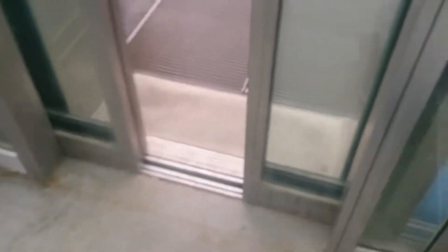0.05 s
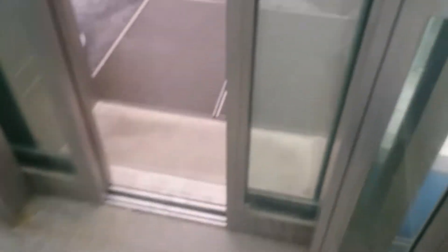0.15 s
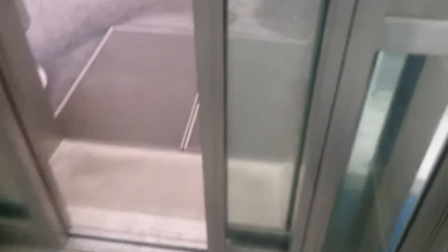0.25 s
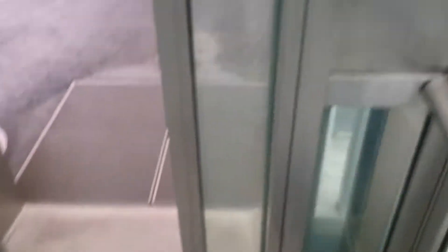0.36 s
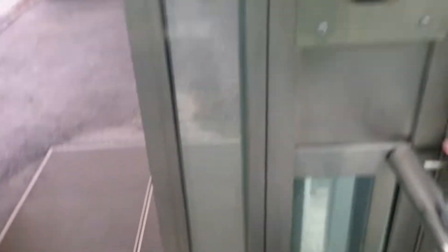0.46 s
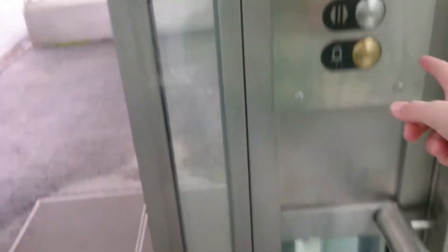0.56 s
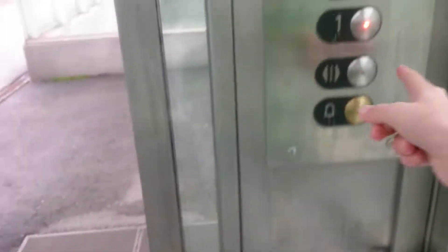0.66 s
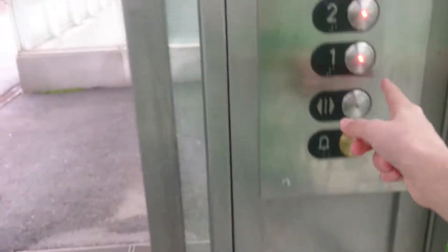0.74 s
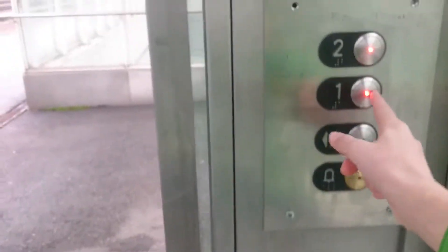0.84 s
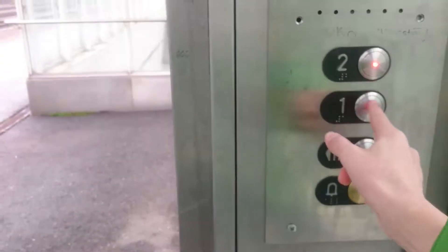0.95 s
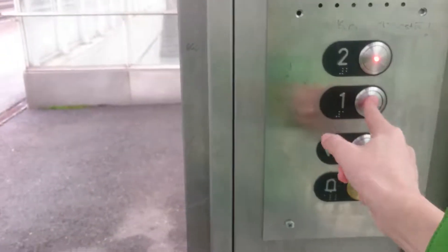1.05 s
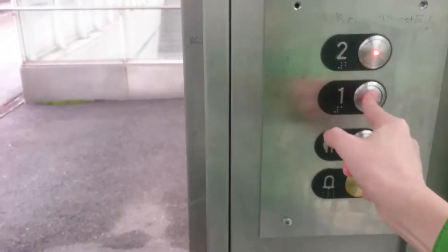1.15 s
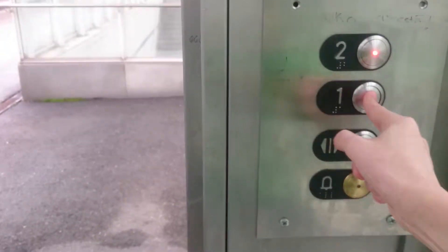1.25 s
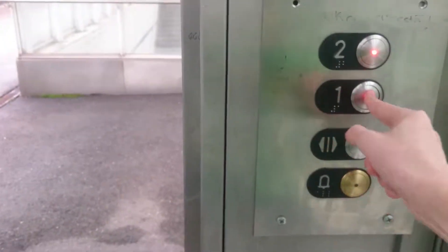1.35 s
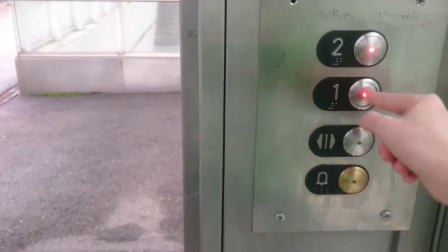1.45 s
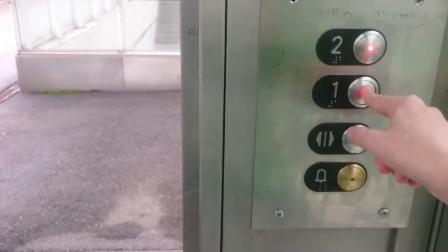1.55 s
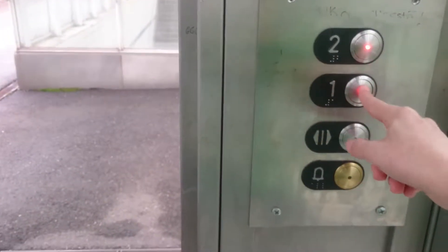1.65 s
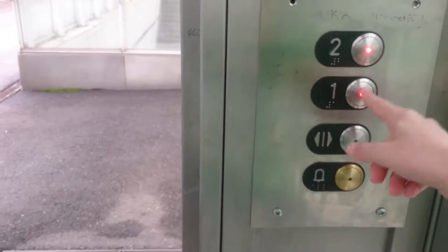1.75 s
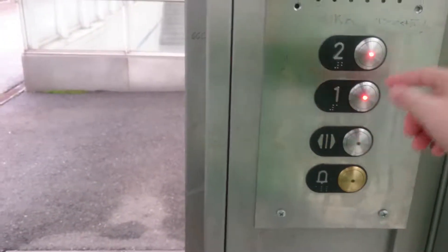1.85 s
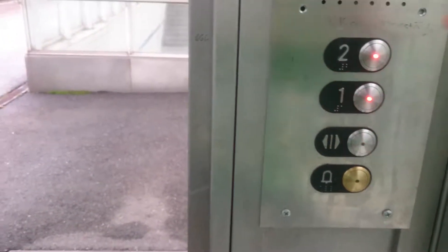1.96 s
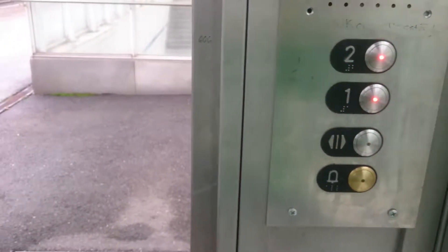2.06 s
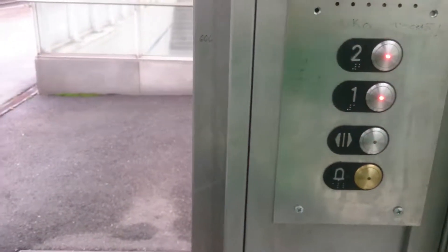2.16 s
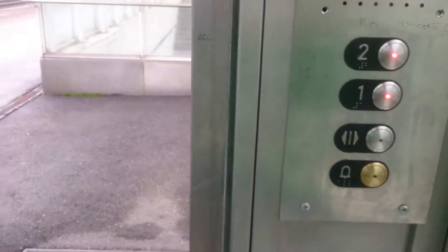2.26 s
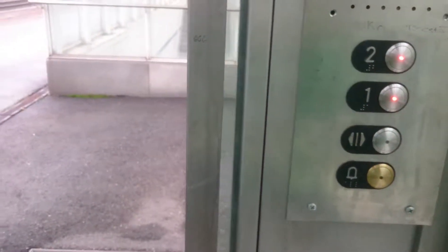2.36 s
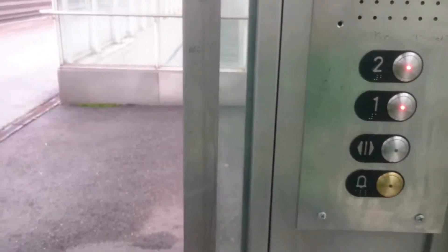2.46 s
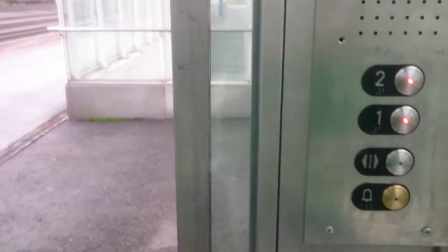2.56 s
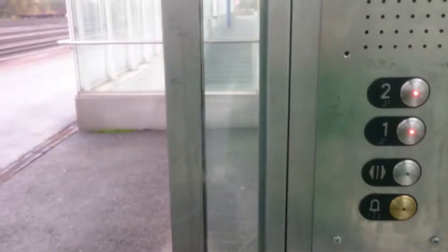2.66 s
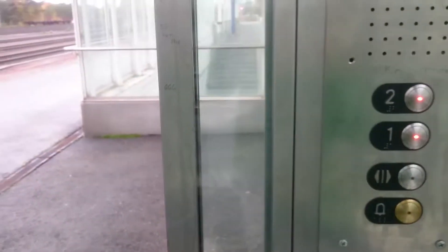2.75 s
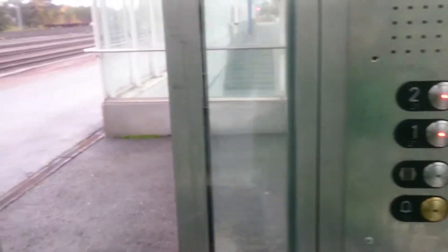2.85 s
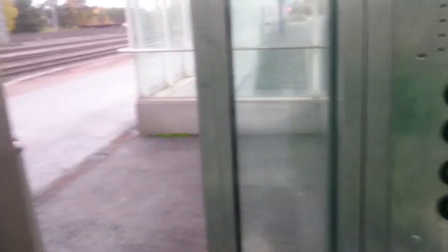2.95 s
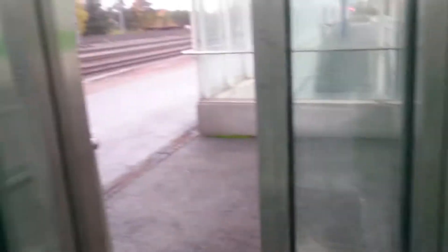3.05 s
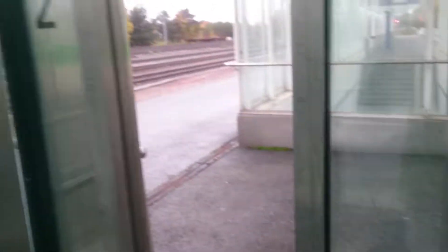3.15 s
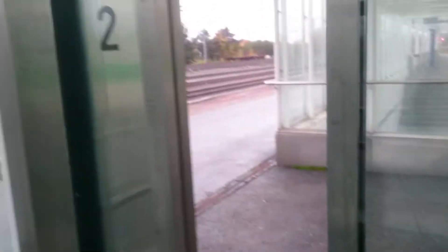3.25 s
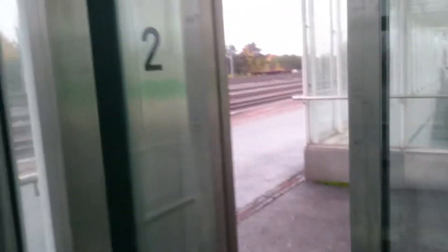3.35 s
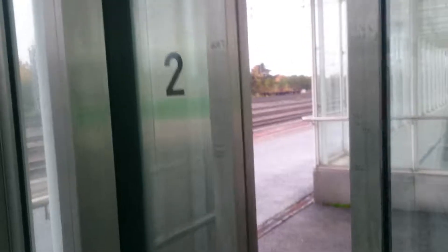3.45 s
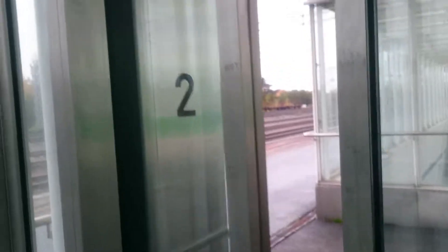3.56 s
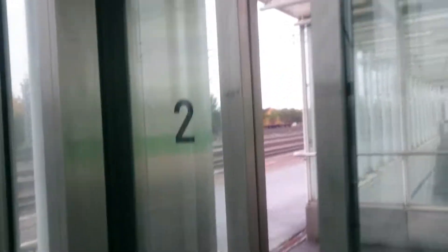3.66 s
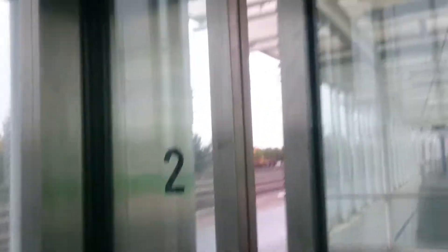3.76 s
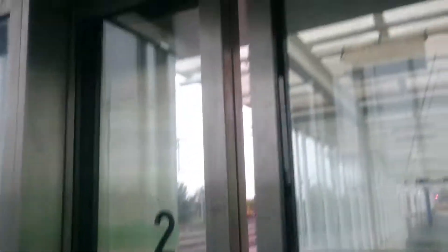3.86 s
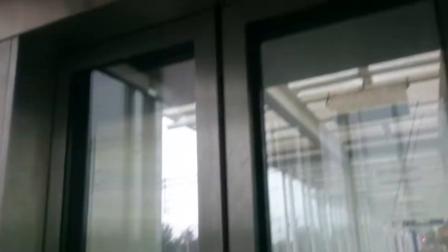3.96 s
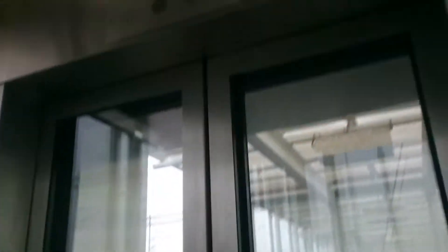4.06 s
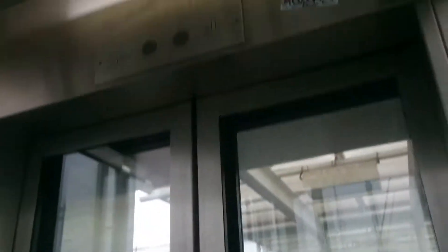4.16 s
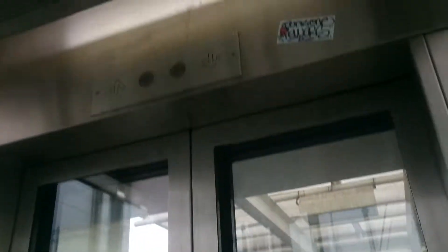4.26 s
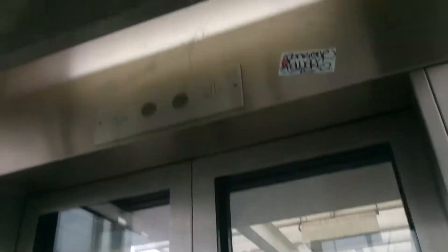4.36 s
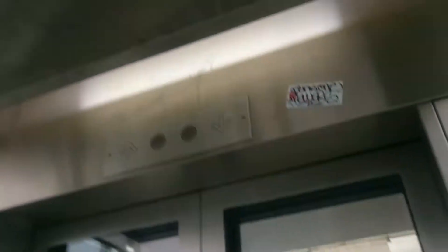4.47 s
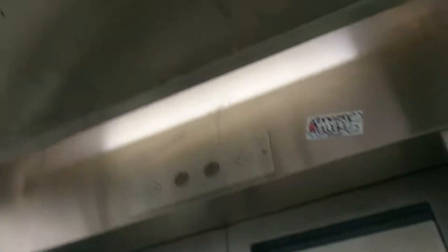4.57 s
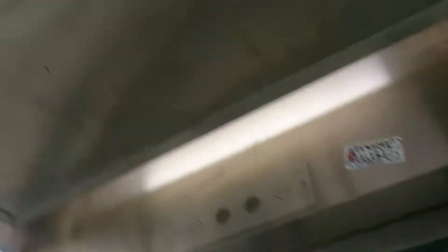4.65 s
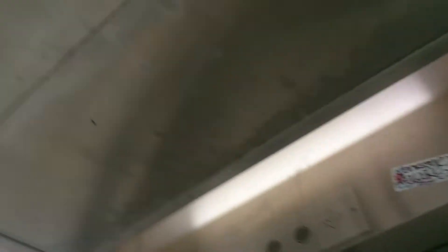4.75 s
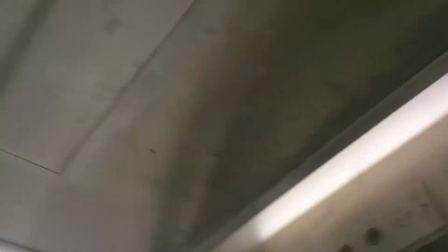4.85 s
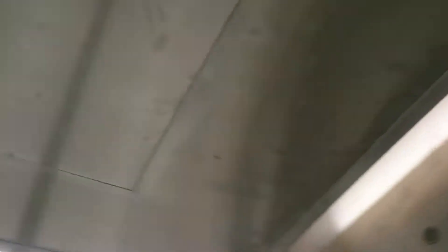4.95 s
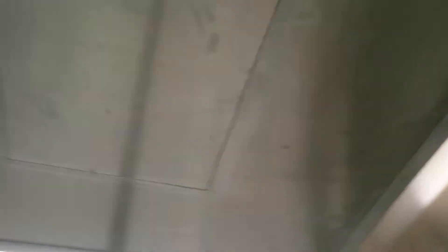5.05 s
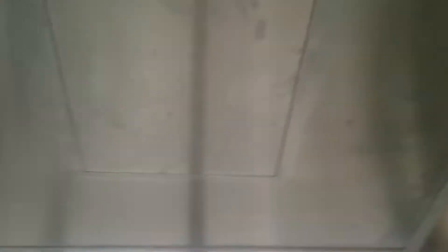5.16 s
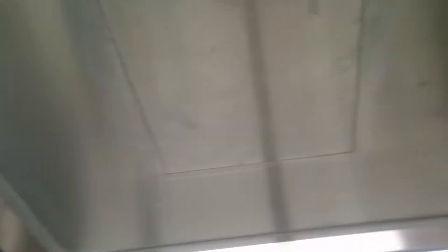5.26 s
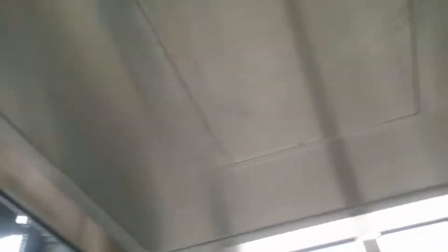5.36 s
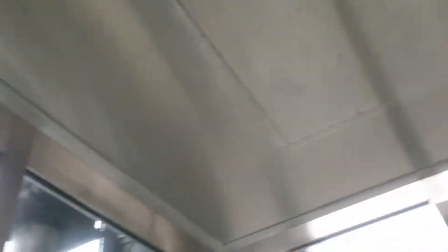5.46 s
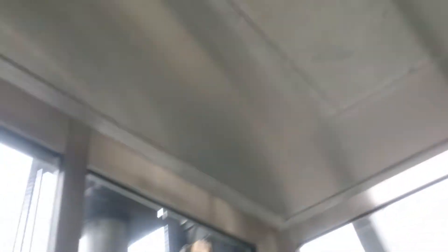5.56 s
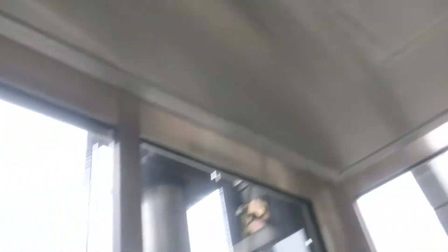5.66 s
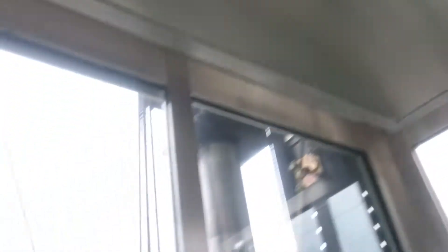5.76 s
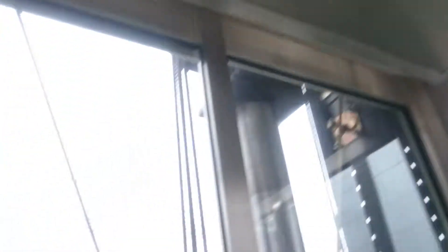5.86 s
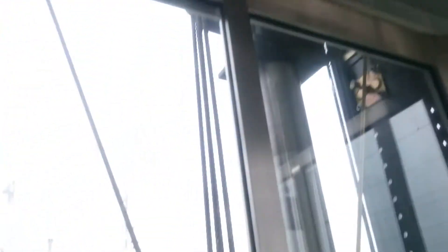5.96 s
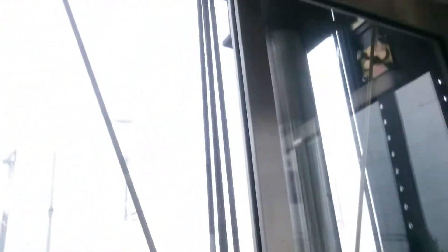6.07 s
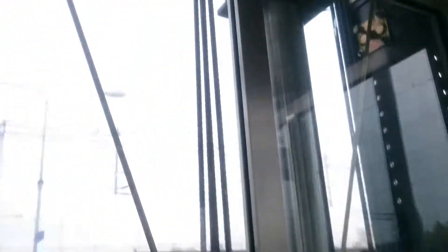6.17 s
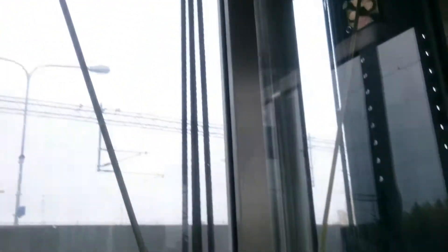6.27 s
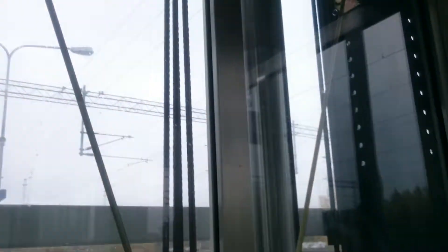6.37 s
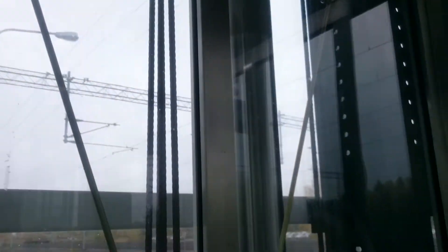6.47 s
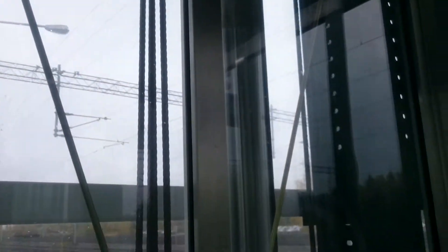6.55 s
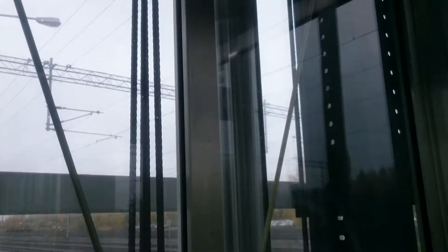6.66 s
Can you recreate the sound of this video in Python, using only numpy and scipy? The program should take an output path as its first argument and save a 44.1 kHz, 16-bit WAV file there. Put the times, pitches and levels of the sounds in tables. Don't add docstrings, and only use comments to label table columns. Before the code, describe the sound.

A small steel and glass lift, heard very close in wide stereo. From 0 s, wind and far traffic enter through the open doors, with faint motor tones and, soon, mains hum. From 0.4 to 1.07 s a door leaf rubs along its track, bright, hissy and grabbing, ending in a light knock. Quieter creeping follows, with small clicks near 1.8-1.9 s. A second uneven scraping stroke runs about 2.3-3.2 s, then a soft creep. At 3.78 s a finger knock and button click; at 4.02 s the latch grates. At 4.06 s the leaves slam, rebounding within 0.1 s and overloading the microphone. Glass and panels ring on; lighter knocks and rattles cluster at 4.35-4.45 s, weaker ones to about 5.2 s. The outside is muffled, the cabin shudders, with faint bumps at 5.0, 5.45 and 5.8 s, then near silence, fading from 6.3 to 6.7 s.

```python
import sys
import numpy as np
from scipy import signal
from scipy.fft import rfft, irfft, next_fast_len
from scipy.io import wavfile
from scipy.ndimage import uniform_filter1d

SR = 44100
rng = np.random.default_rng(int(sys.argv[2]) if len(sys.argv) > 2 else 0)


def persist_wave(psi):
    counts = np.round(np.clip(psi, -1, 1) * 32767).astype(np.int16)
    wavfile.write(sys.argv[1], SR, np.atleast_2d(counts).T)


def to_linear_factor(level_db):
    exponent = np.asarray(level_db, float) / 20
    return 10 ** exponent


N = 295981

SLAM_S = 4.062

# time in seconds, peak in dB, thud and crack in dB relative to it, t60 in seconds.
BLOWS = [(1.066, -25, -34, -10.5, 0.2), (1.82, -28, -31, -12, 0.3), (1.8825, -22, -48, -8.5, 0.19),
         (4.02, -24, -30, -18, 0.35), (4.0617, 2, -18.5, -2, 0.27), (4.0829, 6.5, -14.5, -11.5, 0.21),
         (4.1085, 1.5, -26, -9, 0.22), (4.1378, -6, -16, -14, 0.26), (4.354, -20.5, -10.5, -12.5, 0.17),
         (4.381, -13, -23, -11.5, 0.17), (4.406, -11.5, -24, -25.5, 0.21), (4.4471, -15.5, -8, -8, 0.35)]
# frequency in Hz, density in dB per Hz.
BLOW_COLOUR = [(59, -43.5), (100, -18.5), (134, -29), (223, -15.5), (362, -7), (411, 0.5), (467, -12),
               (589, -7), (697, -15.5), (1340, -8.5), (2930, -8.5), (3700, 0.5), (4760, -9), (9360, -3.5),
               (15500, -19.5)]
BLOW_HZ = [393, 2310, 8200]
BLOW_PAN_DB = [3.0, -1.5]

# time in seconds, peak in dB, thump, knock and snap in dB relative to it.
TICKS = [(1.066, -15.5, -25, -36, -18.5), (1.821, -36, -26, -6, -12), (1.8826, -29, -32, 5, -10),
         (3.7746, -29, -24, -3, -3.5), (4.0627, 0, -28, -27.5, -11.5), (4.3531, -21, -26, -14, -11.5),
         (4.3734, -21, -20, -8, -3), (4.384, -14.5, -18, -10.5, -11.5), (4.4044, -16, -29, -15, -16.5),
         (4.4473, -21.5, -25, -16, -18), (5.439, -43.5, -0.5, -13, -18.5)]
# frequency in Hz, t60 in seconds.
TICK_MODES = [(140, 0.12), (1300, 0.0096), (3700, 0.0057), (9800, 0.0034), (14500, .0015), (5900, .005)]
TICK_PAN_DB = [10, 7.0]

# frequency in Hz, level in dB, t60 in seconds, share at the right port.
LEAVES = [(237.7, -27.5, 2.2, -0.58), (333, -26.5, 2.2, -0.38), (399, -20.5, 1.9, -0.55),
          (407, -22.5, .6, -0.45), (520, -19, 0.31, -0.73)]
# frequency in Hz, level in dB, t60 in seconds.
LATCH = [(1460, -35.5, 0.0087), (2000, -32.5, 0.0071), (3260, -32.5, 0.02), (3570, -27.5, .012),
         (6000, -39, .01)]
LATCH_S = 4.014

# frequency in Hz, density in dB per Hz.
RUB_COLOUR = [(700, -42), (1200, -16), (2400, -8), (2850, -8.5), (3700, 0), (4150, -2), (5000, -11.5),
              (6000, -8), (7600, -15.5), (9600, -10), (10300, -10), (11200, -12.5), (13500, -22.5),
              (15600, -33.5)]
# frequency in Hz, density in dB per Hz.
RATTLE_COLOUR = [(1000, -32), (1600, -21.5), (2200, -12.5), (2800, -13), (3700, -4.5), (4400, -6.5),
                 (5300, -12.5), (7500, -18), (9400, -13.5), (11200, -17.5), (13000, -31), (15600, -40.5)]
# start and end in seconds, hiss and body in dB, rise in dB per second.
STROKES = [
    (0, .34, -53.5, -47.5, 100),
    (0.384, 1.065, -36, -32.5, 400),
    (1.3, 1.9, -71.5, -52.5, 100),
    (1.98, 2.1, -56, -50, 60),
    (2.38, 2.74, -37, -38, 49.5),
    (2.78, 3.082, -38, -33, 200),
    (3.103, 3.198, -44.5, -41, 100),
    (3.303, 3.55, -60, -49, 100),
    (3.6, 4.06, -56, -48.5, 100),
]
STROKE_FALL = 115
# time in seconds, hiss and body in dB.
GRIPS = [(.55, -42, -35.5), (.89, -38, -25.5), (1.41, -62.5, -53), (1.516, -56.5, -48), (2.33, -44, -36),
         (2.396, -41, -33), (2.71, -41, -40), (2.79, -52, -33), (2.94, -42, -37), (3.055, -42, -38)]
GRIP_RISE, GRIP_FALL = 146, 110
# time in seconds, hiss and body in dB, rise in dB per second.
RATTLES = [(4.2, -35, -25, 5), (4.3, -42, -32, 60), (4.375, -38.5, -31, 600), (4.45, -33.5, -24, 120),
           (4.7, -48.5, -43.5, 900), (4.822, -53, -41, 900), (4.875, -51.5, -40, 200),
           (4.95, -48.5, -40.5, 500), (4.975, -45, -37, 200), (5.185, -44, -33, 450), (5.45, -61, -53, 200)]
RATTLE_FALL = 130
RESTING_DB = [-64.5, -59]
RESTING_UNTIL_S, RESTING_FALL = 5.97, 10.7
# time in seconds, frequency in Hz.
SEAL = [(0.36, 3740), (0.91, 3810), (0.98, 3980), (1.13, 3720), (2.7, 3860), (2.76, 3630), (2.9, 3860),
        (3.12, 3680), (3.2, 3940)]
SEAL_DB = [-5, -8]
SEAL_WIDTH_HZ = 170

# frequency in Hz, level in dB, t60 in seconds.
PANELS = [(63, 0, 1.0), (87.6, 4, 2.8), (130, -13.5, .6), (238.2, -5.5, 1.0), (298.3, -10.5, 0.13),
          (361, -3.5, 0.74), (398, 0, .7), (506, -2.5, 0.51), (633, -12, 0.61), (775, -16.5, 0.34)]
PANEL_EVENING_S = .25
# from and until in seconds, level in dB, rise and fall in dB per second.
SHAKING = [
    (4.27, 4.82, -38, 60, 90),
    (4.09, 4.16, -26, 400, 34),
]
SHAKE_REST_DB = [-72, -67.5]
JOLT_SHAKES_DB = [-8, -6]
SHAKE_LUMPS_DB = 1.5
DRONE_HZ, DRONE_DB, DRONE_S, DRONE_FALL = 138, -61, 5.0, 17

# time in seconds, rumble, panel and rush in dB.
JOLTS = [
    (1.09, -49.5, -54, -37.5),
    (3.15, -61, -64, -55),
    (3.777, -60, -54, -60),
    (5.0, -56, -56, -48.5),
    (5.46, -50, -59, -57),
    (5.77, -55, -68, -66),
    (5.88, -66, -54, -62),
]
JOLT_RISE, JOLT_FALL = 320, 200

# frequency in Hz, level in dB, right port in dB.
HUM = [(106.6, -6.5, 0.5), (199, -6.5, 0.5), (305, -2.5, 2), (401, -2, -3.5)]
HUM_ON_S, HUM_OFF_S, HUM_DB, HUM_RISE, HUM_SAG = .8, 3.2, -54, 40, 45
# start and end in seconds, whine and duct tone in dB.
RUNS = [
    (0, .2, -67, -41),
    (.25, 0.358, -69, -39.5),
    (.45, .58, -66, -45),
    (.62, 1.103, -64, -49),
    (2.45, 3.15, -57, -48.5),
    (3.4, 4.06, -62, -49),
]
RUN_RISE, RUN_FALL = 60, 55
WHINE_HZ = 532
DUCT_HZ = [668, 676]

BUMP_S, BUMP_DB, BUMP_HZ, BUMP_T60_S = 3.7755, -31, 110, .035

# frequency in Hz, density in dB per Hz.
AIR_COLOUR = [(14, -42), (22, -9), (100, -7), (200, -16), (400, -7), (650, -3), (1050, 0.5), (2300, -3),
              (2900, -11), (3800, -7.5), (4900, -23), (7800, -33.5), (10500, -36.5), (15600, -44)]
# frequency in Hz, density in dB per Hz.
CABIN_COLOUR = [(14, -44.5), (22, -14.5), (82, -2.5), (125, -20), (200, -18.5), (400, -15), (870, -16.5),
                (1500, -19), (2900, -21.5), (3700, -23.5), (5000, -35), (7000, -35.5), (9400, -30),
                (15600, -51)]
AIR_HZ = [70, 400, 1400, 7000]
# time in seconds, gust in dB.
GUST = [(0, 0), (.4, -3), (.85, -6.5), (1.4, -11.5), (2.3, -17), (2.5, -11), (3.1, -9), (4.06, -9.5)]
OUTDOORS_DB = [-55.5, -48.5, -43]
GUST_SHARE = [1.0, .55, -.05]
GAP_NARROWS_S, GAP_DB_PER_S = 3.18, 7.0
# held until in seconds, level in dB, fall in dB per second, still cabin in dB.
SETTLING = [
    (4.85, -46, 55, -67.5),
    (4.236, -31, 31, -66),
    (4.325, -34, 40.5, -61),
]
STILL_DB_PER_S = [10.5, 5, 3.5]
STILL_S, RUMBLE_LUMPS_DB = 5.53, 3.0
WHISTLE_HZ = 2380

# frequency in Hz, side over mid in dB.
SPREAD = [(25, 15), (60, 10.5), (150, 19.5), (300, 7), (550, 7), (850, 3), (1300, 0), (15000, -0.5)]
# frequency in Hz, left over right in dB.
PORTS = [(60, 2.5), (300, 2), (1000, 5), (2000, 6), (3600, 6.5), (4200, 7.5), (4800, -1.5), (6500, 7.5),
         (8000, 9), (9500, 8.5), (10500, 1), (11500, -6), (13500, -15.5), (15500, -8.5)]
# time in seconds, extra left over right in dB.
TURN = [(0, -1), (.5, 1), (1.5, 2), (2.7, 0.5), (3.5, -1), (4.0, -2), (4.3, -0.5), (5.0, -0.5), (6.0, -0.5),
        (6.71, 0.5)]
OFFSET = -.00046
HISS_DB, FADE_S, FADE_DB_PER_S = -81, 6.3, 62


def blows():
    power = np.full((3, 2, N), 1e-16)
    for s, peak_db, thud_db, crack_db, t60 in BLOWS:
        pan_db = BLOW_PAN_DB[int(s > SLAM_S - .01)]
        at = round(s * SR)
        t = np.arange(min(SR, N - at)) / SR
        layers = [(thud_db, 1.4, .004), (0, 1, .0003), (crack_db, .8, .0002)]
        for k, (rel_db, longer, rise_s) in enumerate(layers):
            wash = to_linear_factor(-120 * t / (t60 * longer))
            sides = to_linear_factor(2 * (peak_db + rel_db - 9) + np.array([[pan_db - 4.5], [0 - pan_db]]))
            power[k, :, at:at + len(t)] += sides * wash * (1 - np.exp(-t / rise_s)) ** 2
    level = np.sqrt(power)
    return noise_bands(BLOW_COLOUR, BLOW_HZ, lambda hz: blend(BLOW_HZ, level, hz))


def ticks():
    s, peak_db, thump_db, knock_db, snap_db = np.transpose(TICKS)
    pan_db = np.where(s < SLAM_S + .01, *TICK_PAN_DB)
    at = np.round((s + .0008) * SR).astype(int)
    between_db = (snap_db + knock_db) / 2 + 3.0
    mode_db = [thump_db, knock_db, 0 * s, snap_db + 6, snap_db + 0.5, between_db]
    out = np.zeros((2, N))
    for (hz, t60), rel_db in zip(TICK_MODES, mode_db):
        clicks = np.full((2, N), 1e-18)
        clicks[:, at] = to_linear_factor(peak_db + rel_db + 2.5 + np.array([pan_db - 2, 3 - pan_db]) / 2)
        r = to_linear_factor(-60 / (t60 * SR))
        turn = 2 * np.pi * hz / SR
        rung = signal.lfilter([0, np.sin(turn)], [1, -2 * r * np.cos(turn), r * r], clicks)
        rung = signal.lfilter(*signal.butter(2, hz / 2.5, "high", fs=SR), rung)
        out += rung * [[1], [np.sign(hz - 500)]]
    return out


def leaves():
    t = np.maximum(np.arange(N) / SR - SLAM_S, 0)
    rise = 1 - np.exp(-t / 0.041)
    out = np.zeros((2, N))
    for hz, db, t60, share in LEAVES:
        out += to_linear_factor(db - 60 * t / t60) * np.sin(2 * np.pi * hz * t) * rise * [[1], [share]]
    return out


def latch():
    t = np.arange(round(.06 * SR)) / SR
    swell = (1 - np.exp(-t / .008)) * np.exp(-t / 0.076)
    grate = 0
    for hz, db, t60 in LATCH:
        scrape = resonate(rng.standard_normal((2, 2 * len(t))), hz, t60)
        grate = grate + to_linear_factor(db) * scrape[:, len(t):]
    out, at = np.zeros((2, N)), round(LATCH_S * SR)
    out[:, at:at + len(t)] = 2.6 * grate * swell * to_linear_factor([[1.5], [-1.5]])
    return out


def rubbing():
    hiss_db, body_db = rub_levels()
    grip = drift(110) + 1.5 * drift(2.7)
    levels_db = np.array([body_db + 0.59 * grip, hiss_db + 0.4 * grip])
    return two_colours(RUB_COLOUR, RATTLE_COLOUR, [3000, 8000], levels_db, 1.2, 6.3) + seal(levels_db[0])


def rub_levels():
    start, stop, hiss_db, body_db, rise = np.transpose(STROKES)
    sliding = swells(start, stop, [hiss_db, body_db], rise, STROKE_FALL)
    s, *grip_db = np.transpose(GRIPS)
    sliding = sliding + swells(s, s, grip_db, GRIP_RISE, GRIP_FALL)
    s, hiss_db, body_db, rise = np.transpose(RATTLES)
    rattling = swells(s, s, [hiss_db, body_db], rise, RATTLE_FALL)
    resting = swells(SLAM_S, RESTING_UNTIL_S, np.reshape(RESTING_DB, (-1, 1)), 0, RESTING_FALL)
    return 10 * np.log10(np.where(np.arange(N) < SLAM_S * SR, sliding, rattling + resting))


def seal(level_db):
    turn = 2 * np.pi * np.cumsum(in_time(SEAL)[0]) / SR
    sides = [drift(SEAL_WIDTH_HZ) * np.cos(turn) + drift(SEAL_WIDTH_HZ) * np.sin(turn) for _ in range(2)]
    return np.array(sides) * to_linear_factor(level_db + np.where(np.arange(N) < SLAM_S * SR, *SEAL_DB))


def shudder():
    deep, upper = shaking() * (np.arange(N) >= SLAM_S * SR)
    out = np.zeros((2, N))
    for hz, level_db, t60 in PANELS:
        rung = resonate(rng.standard_normal((2, N)), hz, t60)
        mid, side = rung / np.sqrt(uniform_filter1d(rung ** 2, round(PANEL_EVENING_S * SR)) + .05)
        drive_level = deep if hz < 180 else upper
        out += to_linear_factor(level_db - 12.5) * drive_level * ports(mid, side * to_linear_factor(at_hz(SPREAD, hz)))
    drone_level = np.sqrt(swells(DRONE_S, DRONE_S, DRONE_DB, 60.0, DRONE_FALL))
    mid, side = resonate(rng.standard_normal((2, N)), DRONE_HZ, .15) * drone_level
    return out + ports(mid, 3.0 * side)


def shaking():
    after = []
    for start, stop, db, rise, fall in SHAKING:
        after.append(swells(start, stop, db, rise, fall) * to_linear_factor(2 * SHAKE_LUMPS_DB * drift(8.0)))
    rest = swells(SLAM_S, RESTING_UNTIL_S, np.reshape(SHAKE_REST_DB, (-1, 1)), 0, 60.0)
    jolted = jolts()[:2] * to_linear_factor(2 * np.reshape(JOLT_SHAKES_DB, (-1, 1)))
    return np.sqrt(np.vstack(after) + rest + jolted)


def jolts():
    s, *peaks_db = np.transpose(JOLTS)
    return swells(s, s, peaks_db, JOLT_RISE, JOLT_FALL)


def bump():
    t = np.maximum(np.arange(N) / SR - BUMP_S, 0)
    return to_linear_factor(BUMP_DB - 60 * t / BUMP_T60_S) * np.sin(2 * np.pi * BUMP_HZ * t) * [[1], [.1]]


def drive():
    start, stop, *tone_db = np.transpose(RUNS)
    whine_db, duct_db = 10 * np.log10(swells(start, stop, tone_db, RUN_RISE, RUN_FALL))
    hum_level = np.sqrt(swells(HUM_ON_S, HUM_OFF_S, HUM_DB, HUM_RISE, HUM_SAG)[0])
    t = np.arange(N) / SR
    hum = np.zeros((2, N))
    for hz, db, right_db in HUM:
        hum += to_linear_factor(db + 7) * np.sin(2 * np.pi * (hz * t + rng.random())) * [[1], [-to_linear_factor(right_db)]]
    whine = resonate(rng.standard_normal(N), WHINE_HZ, 0.21) * [[1], [-.5]]
    duct_hz = np.interp(t, [.6, 2.5], DUCT_HZ) + 9 * drift(25)
    duct = np.sin(2 * np.pi * np.cumsum(duct_hz) / SR) * to_linear_factor(2.8 * drift(18)) * [[1], [-.5]]
    tones = hum * hum_level + whine * to_linear_factor(whine_db + 7) + duct * to_linear_factor(duct_db + 1.5)
    return tones * to_linear_factor(-40 * np.maximum(t - SLAM_S, 0))


def air():
    levels_db = air_levels()
    top_db = levels_db[-1] - 8.5 - 14 * np.maximum(np.arange(N) / SR - 6.1, 0)
    shut = np.arange(N) > 4.6 * SR
    whistle = resonate(rng.standard_normal((2, N)), WHISTLE_HZ, 0.013) * to_linear_factor(top_db + 9.5) * shut
    return two_colours(AIR_COLOUR, CABIN_COLOUR, AIR_HZ, np.vstack([levels_db, top_db]), 0.4, 15.0) + whistle


def air_levels():
    t = np.arange(N) / SR
    open_db = np.outer(GUST_SHARE, in_time(GUST)[0]) + np.reshape(OUTDOORS_DB, (-1, 1))
    open_db[2] -= GAP_DB_PER_S * np.maximum(t - GAP_NARROWS_S, 0)
    shut = []
    for (until, db, fall, still_db), sink in zip(SETTLING, STILL_DB_PER_S):
        shut.append(swells([SLAM_S, SLAM_S], [until, STILL_S], [db, still_db], 0, [fall, sink]))
    levels_db = 10 * np.log10(np.where(t < SLAM_S, to_linear_factor(2 * open_db), np.vstack(shut)) + jolts())
    levels_db[0] += RUMBLE_LUMPS_DB * drift(6.0)
    return levels_db


def two_colours(before, after, centres, levels_db, patchy_db, patch_rate):
    out, slam = 0, round(SLAM_S * SR)
    for spectrum, start, stop in [(before, 0, slam), (after, slam, N)]:
        part = levels_db[:, start:stop]

        def flicker(hz):
            return to_linear_factor(blend(centres, part, hz) + patchy_db * drift(patch_rate, size=stop - start))
        out = out + noise_bands(spectrum, centres, flicker, start, stop)
    return out


def noise_bands(spectrum, centres, gain_at, start=0, stop=N):
    size = next_fast_len(stop - start)
    hz = np.arange(size // 2 + 1) * SR / size
    shape = to_linear_factor(at_hz(spectrum, hz))
    mid, side = rfft(rng.standard_normal((2, size))) * shape
    pair = ports(mid, side * to_linear_factor(at_hz(SPREAD, hz)))
    near = [np.abs(np.log2(hz / c + 1e-9)) < 1 for c in centres]
    even = [1 / np.sqrt(np.sum(shape[n] ** 2) / len(hz)) for n in near]
    out = np.zeros((2, N))
    for centre in 22 * 2 ** np.arange(0, 10, .5):
        if spectrum[0][0] / 1.4 < centre < spectrum[-1][0] * 1.4:
            window = np.cos(np.pi * np.clip(np.log2(hz / centre + 1e-9), -.5, .5)) ** 2
            gain = gain_at(centre) * blend(centres, even, centre)
            out[:, start:stop] += irfft(pair * window, size)[:, :stop - start] * gain
    return out


def swells(start, stop, peaks_db, rise, fall):
    t = np.arange(0, N + 32, 32) / SR
    start, stop, rise, fall = (np.reshape(v, (-1, 1)) for v in (start, stop, rise, fall))
    shape_db = -rise * np.maximum(start - t, 0) - fall * np.maximum(t - stop, 0)
    power = to_linear_factor(2 * np.atleast_2d(peaks_db)) @ to_linear_factor(2 * shape_db) + 1e-20
    return np.array([np.interp(np.arange(N) / SR, t, p) for p in power])


def resonate(x, hz, t60):
    r = to_linear_factor(-60 / (t60 * SR))
    y = signal.lfilter([1, 0, -1], [1, -2 * r * np.cos(2 * np.pi * hz / SR), r * r], x)
    return y / y.std()


def drift(rate, size=N):
    r = np.exp(-40 * np.pi * rate / SR)
    slow = signal.lfilter([1], [1, -2 * r, r * r], rng.standard_normal(size // 20 + 3002))[3000:]
    return np.interp(np.arange(size) / 20, np.arange(len(slow)), slow / slow.std())


def blend(centres, levels, hz):
    shares = [at_hz(list(zip(centres, one)), hz) for one in np.eye(len(centres))]
    return sum(share * level for share, level in zip(shares, levels))


def at_hz(points, hz):
    point_hz, value = np.transpose(points)
    return np.interp(np.log(hz + 1e-9), np.log(point_hz), value)


def in_time(rows):
    s, *columns = np.transpose(rows)
    return np.array([np.interp(np.arange(N) / SR, s, c) for c in columns])


def ports(mid, side):
    return np.array([mid + side, mid - side])


def scene():
    doors = blows() + ticks() + leaves() + latch() + rubbing()
    return doors + shudder() + bump() + drive() + to_linear_factor(-2) * air()


def band_limit(x):
    return signal.sosfilt(signal.butter(12, 15680, fs=SR, output="sos"), x)


def record(dry):
    size = next_fast_len(N)
    tilt_db = at_hz(PORTS, np.arange(size // 2 + 1) * SR / size) / 2
    x = irfft(rfft(dry, size) * to_linear_factor(np.array([tilt_db, -tilt_db])), size)[:, :N]
    turn_db = in_time(TURN)[0] / 2
    x = x * to_linear_factor(np.array([turn_db, -turn_db]))
    hiss = np.diff(rng.standard_normal((2, N + 1)))
    x = x + OFFSET + np.sqrt(swells(0, FADE_S, HISS_DB, 0, FADE_DB_PER_S)) * hiss
    x = x / (1 + np.abs(x / .97) ** 6) ** (1 / 6)
    return band_limit(x)


dry = scene()
out = record(dry)
persist_wave(out)
```